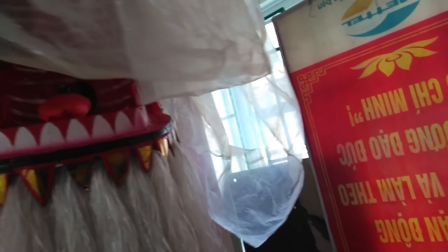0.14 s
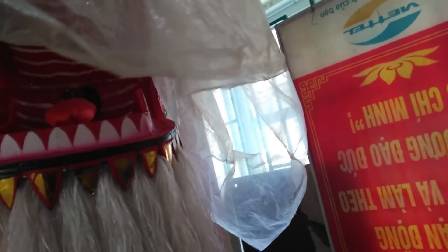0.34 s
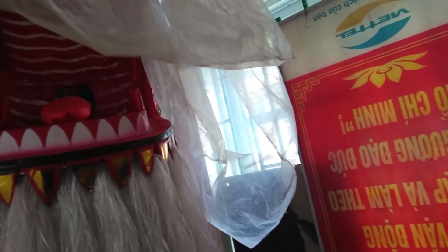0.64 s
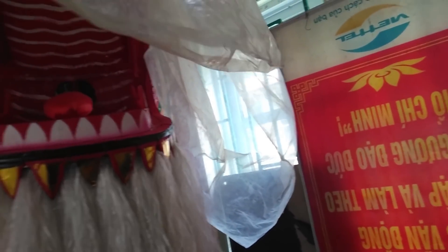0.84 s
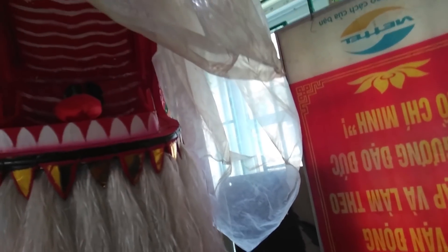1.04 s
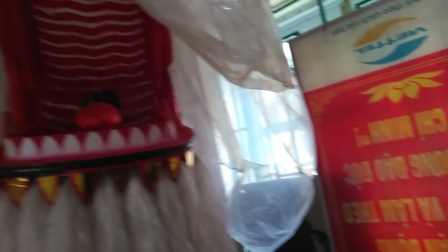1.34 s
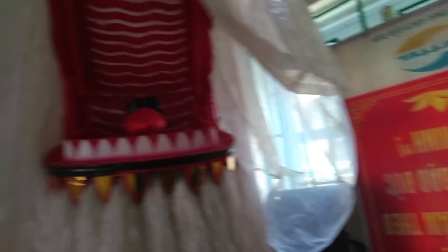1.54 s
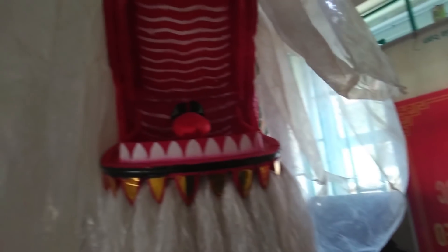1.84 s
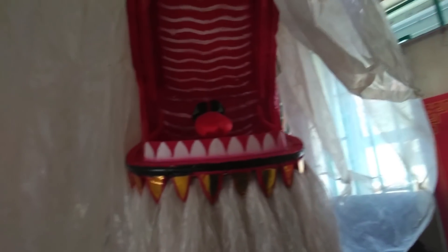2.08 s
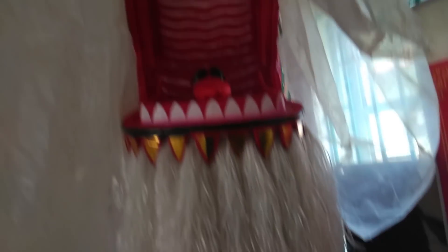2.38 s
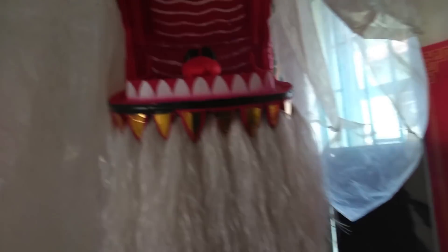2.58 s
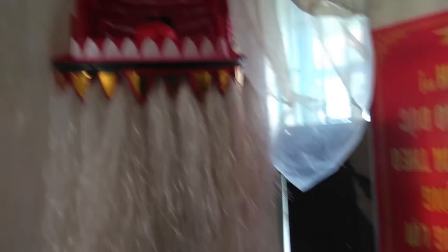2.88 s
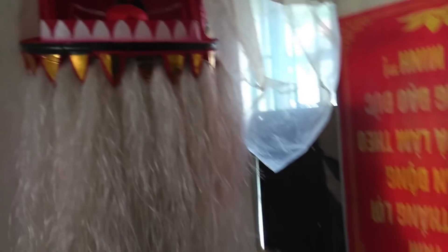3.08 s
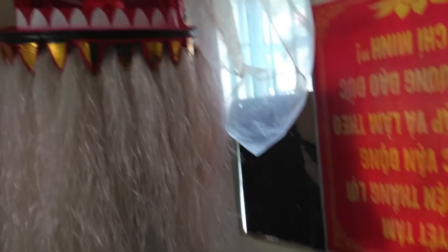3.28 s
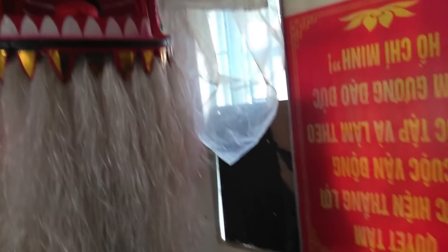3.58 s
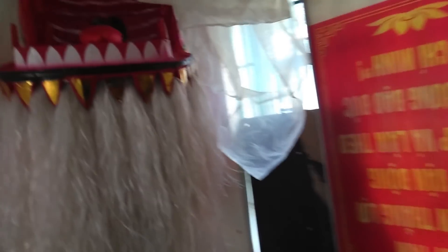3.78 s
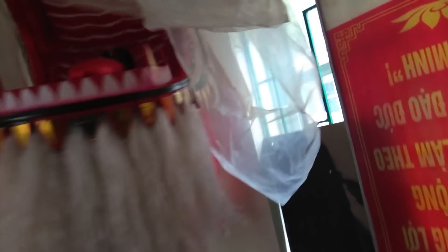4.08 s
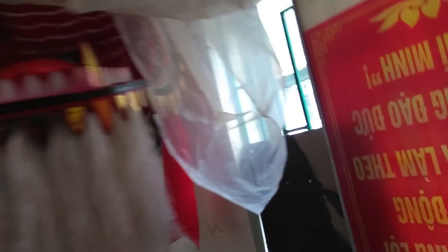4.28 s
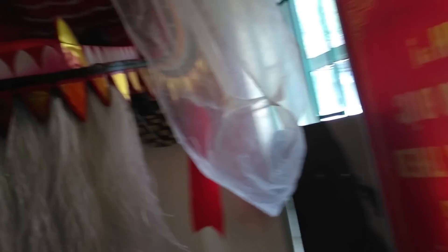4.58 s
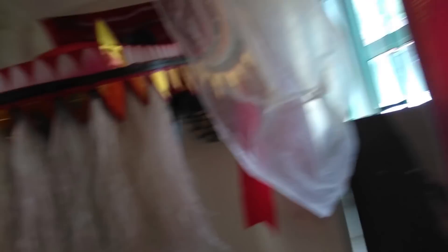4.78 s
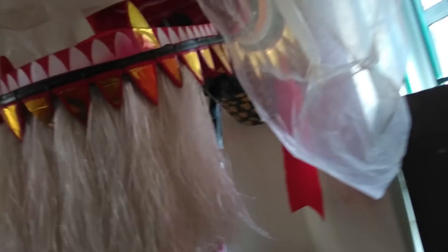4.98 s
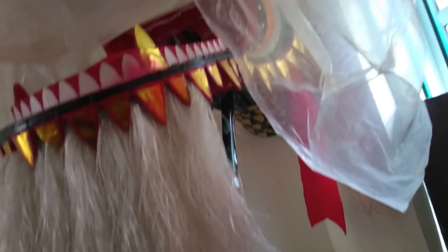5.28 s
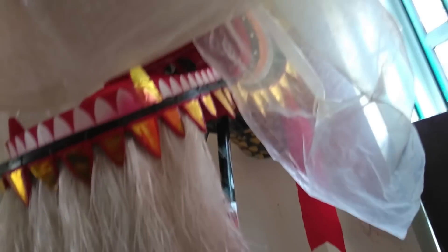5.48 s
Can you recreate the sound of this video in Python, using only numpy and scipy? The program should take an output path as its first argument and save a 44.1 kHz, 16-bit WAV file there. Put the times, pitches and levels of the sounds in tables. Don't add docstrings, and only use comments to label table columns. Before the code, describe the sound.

A dry, bright plastic hiss is already under way, dotted with crisp crease clicks, then thins to almost nothing around the middle. A second, smoother stroke swells and dies away with heavy fold rustles. Handling thumps and rumble are soft and low. Late on, something hard knocks farther off with a short room echo, then the scraping fades out. Close, essentially mono, indoor phone pickup.

```python
import sys
import numpy as np
from scipy import signal
from scipy.fft import rfft, irfft, next_fast_len
from scipy.io import wavfile
from scipy.ndimage import uniform_filter1d, map_coordinates

SR = 44100
rng = np.random.default_rng(int(sys.argv[2]) if len(sys.argv) > 2 else 0)


def magnitude_from_level(level_db):
    exponent = np.asarray(level_db, float) / 20
    return 10 ** exponent


def dump(signal):
    limited = np.clip(np.atleast_2d(signal).T, -1, 1)
    pcm = np.round(limited * 32767).astype(np.int16)
    wavfile.write(sys.argv[1], SR, pcm)


N = 248283


def unit(x):
    return x / np.sqrt(np.mean(x ** 2) + 1e-20)


def along(points, hz):
    f, v = np.transpose(points)
    return np.interp(np.log(hz + 1), np.log(f + 1), v)


def curves(rows):
    s, *cols = np.transpose(rows)
    return [np.interp(np.arange(N) / SR, s, c) for c in cols]


def wobble(rate):
    coarse = np.arange(0, N + 16, 16)
    points = rng.standard_normal(int(N * rate / SR) + 4)
    return np.interp(np.arange(N), coarse, map_coordinates(points, [coarse * rate / SR]))


def filtered(x, response):
    m = next_fast_len(len(x) + 8192)
    return irfft(rfft(x, m) * response(np.fft.rfftfreq(m, 1 / SR)), m)[:len(x)]


def swells(rows, rise_s):
    t = np.arange(0, N + 64, 64) / SR
    s, db, t60 = np.transpose(rows)[:, :, None]
    gain = magnitude_from_level(db - 60 * np.maximum((s - t) / rise_s, (t - s) / t60))
    return np.interp(np.arange(N) / SR, t, np.sqrt((gain ** 2).sum(0)))


def rubbing(spectrum, patchy_db, grit_db):
    z = signal.stft(rng.standard_normal(N + 512), nperseg=512)[2]
    patches = uniform_filter1d(rng.standard_normal(z.shape), size=3, axis=0)
    patches = uniform_filter1d(patches, size=12, axis=1)
    noise = signal.istft(z * magnitude_from_level(patchy_db * unit(patches)), nperseg=512)[1][:N]
    slipping = rng.random(N) < 600 / SR
    slips = rng.uniform(-0.8, 1, N) * slipping * magnitude_from_level(0.63 * wobble(24))
    return unit(filtered(noise + magnitude_from_level(grit_db) * unit(slips), lambda hz: magnitude_from_level(along(spectrum, hz))))


def slide():
    # (time [s], pressure [dB], brightness [dB])
    pull = [(0, -34.5, -4.5), (.13, -36, -2.5), (.65, -37.5, -2.5), (1.04, -41.5, -2), (1.2, -47, 3.5),
            (1.45, -46.5, -1.5), (1.83, -55.5, 4), (2.4, -80, 7), (2.53, -63.5, 16), (2.66, -46.5, 2.5),
            (2.9, -40, 1), (3.34, -37, -1), (3.95, -35, -1.5), (4.25, -39, 0.5), (4.5, -44, 0.5),
            (5.02, -47.5, 7.5), (5.2, -52, 8.5), (5.63, -55.5, 8.5)]
    # (time [s], pressure [dB], t60 [s])
    shakes = [
        (1.86, -48.5, 1.26),
        (2.195, -53.5, 0.92),
        (4.23, -41.5, 1.8),
        (5.38, -68, 0.34),
    ]
    # (time [s], body level [dB], t60 [s])
    brushes = [(.0, -42, 0.82), (.92, -47, 2.5), (2.55, -52.5, 2), (3.33, -61, 1.5), (4.19, -47, 1.9),
               (4.69, -47, 0.25), (4.77, -44, 0.27), (5.12, -59, .8), (5.35, -54.5, 0.65),
               (5.58, -51, 0.16)]
    # (frequency [Hz], level [dB per Hz])
    hiss_colour = [(1470, -39), (2500, -4), (2680, -5.5), (3570, -4.5), (4030, -3), (4890, -0.5),
                   (8000, -8), (10400, -26), (17600, -120)]
    body_colour = [(350, -64), (600, -15), (657, -12.5), (1120, -3.5), (1360, -3), (1670, -1.5), (2690, -3),
                   (3200, -4), (4160, -8), (7040, -120)]
    fizz_colour = [(4120, -43), (7000, -33.5), (8390, -6.5), (10400, -8), (13600, -11), (15600, -15)]

    pull_db, bright_db = curves(pull)
    hiss_db = 20 * np.log10(np.hypot(magnitude_from_level(pull_db), swells(shakes, rise_s=0.086)))
    body_db = -46.5 + 0.71 * (hiss_db + 40)
    fizz_db = -48.5 + 1.425 * (hiss_db + 40) + bright_db
    flutter = 0.1 * wobble(9.0) + 0.23 * wobble(30)
    hiss = magnitude_from_level(hiss_db + flutter) * rubbing(hiss_colour, patchy_db=1.5, grit_db=-8.0)
    belly = np.hypot(magnitude_from_level(body_db), swells(brushes, rise_s=0.22))
    body = belly * magnitude_from_level(flutter + 0.23 * wobble(26)) * rubbing(body_colour, patchy_db=1.0, grit_db=-5.0)
    fizz = magnitude_from_level(fizz_db + flutter + 0.42 * wobble(12)) * rubbing(fizz_colour, patchy_db=-1.4, grit_db=-10)
    return hiss + body + fizz


def grip():
    # (time [s], rumble level [dB], t60 [s])
    holds = [(0, -69, 3), (.34, -79, 0.54), (.58, -89, 1), (.9, -89, 2), (1.02, -75, 0.27),
             (1.13, -68, 0.32), (1.44, -76, 0.54), (1.79, -83, 1.5), (2.19, -66, 0.75), (2.51, -60.5, 0.47),
             (2.71, -66, 0.75), (3.01, -63.5, 1.5), (3.13, -74, 1), (3.21, -67, 0.18), (3.6, -98, 2.6),
             (3.81, -71, 0.74), (4.06, -74, .7), (4.19, -68, 1.9), (4.34, -63.5, 1.1), (4.5, -79, 1),
             (4.61, -67, .45), (4.77, -55.5, 1.3), (4.99, -55, 0.91), (5.09, -55, .5), (5.25, -80, 1.3)]
    # (frequency [Hz], level [dB per Hz])
    rumble_colour = [(13, -48), (22, -27), (32, -32), (50, 0), (70, 8.5), (140, 4.5), (180, -1.5),
                     (310, -120)]

    rumble = unit(magnitude_from_level(wobble(9.4)) * rubbing(rumble_colour, patchy_db=6.0, grit_db=-12))
    return (swells(holds, rise_s=0.097) + magnitude_from_level(-100)) * rumble


def ridges():
    # (time [s], ridges per second [Hz],
    # first tone [dB], second tone [dB], third tone [dB], fine weave [dB])
    strokes = [
        [(0, 1272, -64, -62, -62, -61), (.2, 1272, -64, -64, -60, -60), (.3, 1268, -64, -62, -50, -60),
         (.36, 1245, -63, -52, -47, -64), (.48, 1205, -63, -51, -55, -68), (.55, 1200, -68, -61, -56, -65),
         (.62, 1225, -72, -56, -64, -62), (.69, 1222, -74, -65, -69, -60), (.88, 1070, -86, -72, -79, -62),
         (1.1, 958, -97, -78, -90, -66), (1.35, 842, -99, -85, -99, -72)],
        [(2.65, 795, -80, -66, -99, -95), (2.78, 915, -69, -55, -95, -85), (2.9, 1010, -65, -56, -86, -74),
         (3.01, 1150, -61, -53, -79, -66), (3.14, 1238, -58, -51, -72, -61), (3.26, 1292, -54, -57, -66, -59),
         (3.38, 1340, -56, -50, -58, -58), (3.46, 1355, -57, -60, -58, -58), (3.55, 1378, -50, -62, -58, -59),
         (3.66, 1392, -52, -62, -58, -58), (3.72, 1400, -61, -60, -59, -58), (3.92, 1422, -60, -66, -61, -57),
         (4.08, 1340, -62, -70, -72, -61), (4.3, 1160, -76, -71, -91, -66), (4.74, 912, -92, -80, -92, -68)],
        [(4.73, 1070, -99, -91, -99, -62), (5.1, 870, -99, -90, -99, -65), (5.4, 725, -99, -90, -99, -69),
         (5.55, 650, -99, -90, -99, -88)],
    ]
    upper_weave_db = [-30, -30, -2]

    out, t = np.zeros(N), np.arange(N) / SR
    for stroke, over_db in zip(strokes, upper_weave_db):
        rate_hz, first_db, second_db, third_db, weave_db = curves(stroke)
        tones = [(1, first_db), (2, second_db), (3, third_db), (10, weave_db), (15, weave_db + over_db)]
        start_s, end_s = stroke[0][0], stroke[-1][0]
        during = np.interp(t, [end_s, end_s + .05], [1, 0]) * (t >= start_s)
        phase = 2 * np.pi * np.cumsum(rate_hz * (1 + .0035 * wobble(35))) / SR
        fuzz = 2 * np.pi * 70 * np.cumsum(wobble(250)) / SR
        for k, db in tones:
            level = np.sqrt(2) * magnitude_from_level(db + 2.3 + 1.1 * wobble(22))
            out += during * level * np.sin(k * phase + .7 * wobble(60) + (k > 3) * fuzz)
    return out


def folds():
    # (time [s], rustle level [dB], t60 [s], weight [dB])
    shifts = [(.03, -45.5, 1.9, -9.5), (.33, -54.5, 0.75, -5), (.55, -54.5, 1.8, -34),
              (.66, -54.5, 2.1, -17), (.82, -53, 0.76, -29), (.97, -49, 0.54, -18), (1.109, -51, 0.12, -19),
              (1.44, -48.5, 0.45, -1.5), (1.57, -53.5, 0.65, -18), (1.73, -54.5, 0.17, -19),
              (1.85, -66, 0.36, -17), (1.93, -64, 0.26, 0), (2.19, -56.5, 0.41, -18),
              (2.52, -76.5, 1.2, -9), (2.77, -73, 1.7, -4), (3.0, -52.5, 0.15, -2), (3.09, -47.5, 1.35, -5),
              (3.38, -44, 1.7, -19), (3.79, -54.5, 2, 1), (3.94, -54, 1.2, -15), (4.1, -46, 1.35, -21),
              (4.2, -43.5, 0.65, -2), (4.37, -49.5, 0.47, 1), (4.65, -44, 1.5, -11), (4.7, -59, 0.52, -12),
              (4.75, -49, 0.37, 2.5), (4.94, -57, 0.65, -21), (4.99, -53.5, 0.89, 0),
              (5.199, -51, 0.62, -28), (5.3, -60, 0.34, -17), (5.53, -75, 0.84, -22)]
    # (frequency [Hz], level [dB per Hz])
    dull_colour = [(180, -39), (300, -7), (328, 0), (371, -0.5), (800, -4), (1040, -1), (1760, -120)]
    deep_colour = [(76, -46), (130, -5), (183, 2.5), (254, 8.5), (300, 4.5), (390, -19), (660, -120)]

    rise_s = 0.23
    dull_gain = swells([row[:3] for row in shifts], rise_s) + magnitude_from_level(-85.5)
    heavy = [(s, db + weight_db, 0.72 * t60) for s, db, t60, weight_db in shifts]
    deep_gain = swells(heavy, rise_s) + magnitude_from_level(-103)
    dull = unit(magnitude_from_level(0.53 * wobble(13)) * rubbing(dull_colour, patchy_db=1.0, grit_db=-10.0))
    deep = unit(magnitude_from_level(0.72 * wobble(6.3)) * rubbing(deep_colour, patchy_db=2.0, grit_db=-4))
    return dull_gain * magnitude_from_level(-5.0) * dull + deep_gain * magnitude_from_level(-7.5) * deep


def snaps():
    # (time [s], peak level [dB], ring [Hz], low part [dB])
    soft_creases = [(0.0521, -19, 7050, -33), (0.0531, -20.5, 3660, -27), (0.1538, -23, 3800, -20),
                    (0.2566, -23, 3200, -25), (0.2952, -25, 4300, -9), (0.2965, -19, 4200, -24),
                    (0.2968, -24, 2350, -17), (0.5738, -18.5, 5300, -46), (0.5752, -30, 4330, -42),
                    (0.639, -23, 4770, -6), (0.6642, -21, 5000, -13), (0.7637, -13.5, 5730, -34),
                    (0.7638, -31, 8800, -40), (0.7645, -18, 4330, -30), (0.7644, -21, 3130, -32),
                    (0.7722, -36, 6100, -30), (0.8534, -32, 4330, -1), (0.7012, -22.5, 5700, -27),
                    (0.9442, -27.5, 6500, -22), (0.945, -25, 3080, -4.5), (0.9485, -27, 4040, -13),
                    (0.876, -29, 3820, -4), (1.057, -29.5, 5950, -7), (1.0556, -27.5, 2530, -3.5),
                    (1.288, -33.5, 3200, -14), (1.4147, -30, 4300, -10), (1.4529, -24, 3000, -15),
                    (1.4615, -23.5, 3640, -11), (1.664, -35, 2110, -23), (1.7106, -36, 3660, -1),
                    (2.0466, -43.5, 2450, 0), (2.17, -51, 5020, 4.5), (2.1723, -45, 4900, 8),
                    (2.1919, -28, 4850, -8.5), (2.1908, -33, 2480, -8), (2.2125, -35.5, 2200, -23),
                    (2.2523, -43, 2770, 4), (2.3118, -43, 2725, -6.5), (2.445, -50, 2820, -16),
                    (2.4907, -55, 2280, -14), (2.508, -50, 3480, -2), (2.524, -41, 2600, -2),
                    (2.9841, -26.5, 4260, -6), (4.2206, -22, 5700, -23), (5.5799, -41, 1920, -25),
                    (5.58, -39.5, 3540, -18), (5.582, -38, 5200, -16), (5.6285, -39, 4300, -15)]
    # (time [s], peak level [dB], ring [Hz], low part [dB])
    stiff_creases = [(1.4263, -26, 4700, -2.5), (1.4304, -21.5, 5300, -13), (1.8513, -18.5, 5150, -13),
                     (1.8522, -34, 6500, -2.5), (1.8963, -35, 4600, -3), (1.9235, -30, 2380, -14),
                     (1.9257, -28.5, 5100, -11), (1.9268, -34, 2590, -10.5), (4.6094, -24, 6200, -7.5),
                     (4.9203, -28, 6900, -24), (5.2979, -39, 7300, -4), (5.4602, -30.5, 5800, -29),
                     (5.4605, -40, 8400, -23)]

    out, t = np.zeros(N + SR), np.arange(SR // 20) / SR
    click = 9 * (np.arange(len(t)) == 4)
    creases = [(*row, 0.004, -20) for row in soft_creases]
    creases += [(*row, 0.0026, -11.5) for row in stiff_creases]
    for s, db, hz, low_db, t60, high_db in creases:
        noise = rng.standard_normal((3, len(t)))
        edge = magnitude_from_level(-60 * t / t60) * (1 - np.exp(-t / .00008))
        fade = edge + magnitude_from_level(-5) * np.interp(t - 0.00116, t, edge, left=0)
        near_ring = lambda f: np.exp(-(np.log((f + 1) / hz) / 0.38) ** 2)
        crack = unit(filtered(noise[0] + click, near_ring))
        ring = np.sin(2 * np.pi * hz * t * (1.04 - 30 * t)) + .33 * crack
        ring = ring / np.abs(ring * fade).max()
        tap = unit(filtered(noise[1], lambda f: (f > 500) * (f < 2500))) * fade ** 0.17
        bright = lambda f: (f > 6500) * (1 - 0.35 * np.exp(-((f - 10800) / 1200) ** 2))
        tick = unit(filtered(noise[2] + click, bright)) * edge ** 0.47
        snap = ring * fade + 0.32 * magnitude_from_level(low_db) * tap + 0.35 * magnitude_from_level(high_db) * tick
        out[round(s * SR):][:len(t)] += magnitude_from_level(db + 2) * snap
    return filtered(out[:N], lambda f: 1 / (1 + (300 / (f + 1)) ** 4))


def whistles():
    # (start [s], end [s], pitch [Hz], level [dB])
    tones = [
        (2.62, 3.35, 11600, -64),
        (.3, .5, 11000, -62),
        (4.36, 4.62, 68, -67),
        (4.28, 4.4, 70, -64),
    ]

    out, t = np.zeros(N), np.arange(N) / SR
    scatter = np.cumsum(wobble(200)) / SR
    for start_s, end_s, hz, db in tones:
        swell = np.sin(np.pi * np.clip((t - start_s) / (end_s - start_s), 0, 1)) ** .5
        out += magnitude_from_level(db + 4) * swell * np.sin(2 * np.pi * hz * (t + .007 * scatter))
    return out


def bumps():
    # (time [s], peak level [dB], ring [Hz], t60 [s], puff level [dB])
    contacts = [(0.979, -58, 703, 0.25, 1), (1.109, -78, 570, 0.17, 3), (1.422, -50.5, 395, 0.25, 5),
                (2.184, -46, 692, 0.13, 15.5), (2.463, -55, 94, 0.12, 11.5), (3, -55, 141, 0.13, -6),
                (3.071, -44.5, 242, 0.27, 2), (3.384, -45, 570, 0.24, -30), (3.499, -45, 590, 0.4, -11),
                (3.788, -49, 346, 0.25, -8), (3.79, -49, 227, 0.18, -13), (3.389, -51, 253, 0.37, -5),
                (3.935, -42.5, 405, 0.11, -12), (4.182, -46, 512, 0.23, 6), (4.83, -41.5, 623, 0.24, -16),
                (4.975, -47, 120, 0.24, 15), (5.018, -48, 100, 0.3, -16), (5.089, -57, 115, 0.12, 10),
                (5.18, -57, 557, 0.23, -17)]

    out, t = np.zeros(N + SR), np.arange(SR // 2) / SR
    for s, db, hz, t60, puff_db in contacts:
        fade = magnitude_from_level(-60 * t / t60) * (1 - np.exp(-t / 0.0089))
        puff = unit(filtered(rng.standard_normal(len(t)), lambda f: f / (1 + (f / 700) ** 4)))
        ring = np.sin(2 * np.pi * hz * t)
        out[round(s * SR):][:len(t)] += magnitude_from_level(db) * fade * (ring + 0.14 * magnitude_from_level(puff_db) * puff)
    return out[:N]


def knock():
    # (time [s], peak level [dB])
    landings = [
        (4.742, -18.5),
        (4.753, -24.5),
    ]
    # (pitch [Hz], level [dB], t60 [s])
    modes = [(570, 1, 0.1), (626, -7, 0.3), (1100, -4, 0.2), (1220, -1, 0.21), (1310, -2, 0.3),
             (1850, -11, 0.3), (2270, 2, 0.3), (2860, -10, 0.3), (3520, -11, 0.2), (4020, 0, 0.066)]
    # (frequency [Hz], level [dB per Hz])
    burst_colour = [(88, -27), (150, -11), (638, -5), (799, -10), (1290, 3.5), (2420, -4), (2710, -10),
                    (7000, -10), (9100, -44), (15400, -120)]

    out, t = np.zeros(N + SR), np.arange(SR // 2) / SR
    for s, db in landings:
        ring = np.zeros(len(t))
        for hz, level, t60 in modes:
            fade = magnitude_from_level(level - 60 * t / min(t60, .06))
            ring += fade * np.sin(2 * np.pi * hz * t + rng.uniform(0, 5.7))
        burst = unit(filtered(rng.standard_normal(len(t)), lambda f: magnitude_from_level(along(burst_colour, f))))
        burst *= magnitude_from_level(-60 * t / 0.076) + magnitude_from_level(-7 - 60 * t / 0.5)
        ring *= 1 - np.exp(-t / 0.0018)
        out[round(s * SR):][:len(t)] += magnitude_from_level(db - 15.5) * ring + magnitude_from_level(db - 17.0) * burst
    return out[:N]


def room(x):
    # (frequency [Hz], t60 [s])
    ring_times = [
        (200, 0.13),
        (2000, 0.43),
        (10000, 0.032),
    ]

    hz, t, z = signal.stft(rng.standard_normal(SR // 2), SR, nperseg=256)
    tail = signal.istft(z * magnitude_from_level(-60 * t / along(ring_times, hz)[:, None]), SR, nperseg=256)[1]
    return signal.fftconvolve(np.pad(x, (200, 0)), tail / np.linalg.norm(tail))[:N]


def scene():
    near, far, whine = snaps(), knock(), ridges() + whistles()
    mono = slide() + grip() + folds() + near + whine + bumps() + far
    mono += room(magnitude_from_level(-13.5) * near + magnitude_from_level(-10) * far)
    mono += magnitude_from_level(-9) * room(whine)
    return np.array([mono, mono])


def gated(x):
    # (frequency [Hz], level [dB])
    closing = [(100, -114), (500, -100), (2000, -95), (6000, -95), (11000, -100), (13000, -99),
               (15500, -97)]
    # (centre [Hz], width [Hz], shift [dB])
    bias = [(520, 150, 5), (15200, 900, 2), (2000, 200, 5), (2450, 200, 7), (2850, 200, -8), (4000, 200, 5),
            (4600, 150, 5), (5100, 200, -3), (5650, 250, 11), (6250, 200, -5), (7000, 350, 7),
            (12500, 2000, 3)]
    # (frequency [Hz], gain [dB])
    shut = [(100, -10), (450, -14), (700, -22), (6000, -24), (7500, -18), (9500, -15), (11000, -42),
            (16000, -46)]
    # (frequency [Hz], size [dB])
    ragged = [
        (100, 5),
        (8000, 4.5),
        (12000, 3.2),
    ]
    # (time [s], shift [dB])
    top_drift = [(0, -1), (1.6, -1), (1.75, 1), (1.9, -3), (2.15, -4), (2.3, 1), (4.9, 0), (5.3, 6),
                 (5.63, 11)]

    hz, t, z = signal.stft(x, SR, nperseg=2048)
    band = np.arange(len(hz)) // 8
    power = np.add.reduceat(np.abs(z) ** 2, np.arange(0, len(hz), 8)) / 8
    drift = unit(uniform_filter1d(rng.standard_normal(power.shape), size=6, axis=1))
    ragged_db = along(ragged, hz[::8])[:, None] * drift
    bias_db = sum(db * np.exp(-((hz - at_hz) / wide_hz) ** 2) for at_hz, wide_hz, db in bias)
    threshold_db = along(closing, hz) + bias_db
    margin_db = (10 * np.log10(power + 1e-20) + ragged_db)[band] - threshold_db[:, None]
    top_share = 1 / (1 + (13500 / (hz + 1)) ** 16)
    margin_db -= np.outer(top_share, np.interp(t, *np.transpose(top_drift)))
    closed = 1 / (1 + np.exp(np.clip(margin_db / .8, -30, 30)))
    gain = magnitude_from_level(along(shut, hz)[:, None] * closed) * (hz < 15750)[:, None]
    streaks = uniform_filter1d(rng.standard_normal(z.shape), size=3, axis=0)
    streaks = uniform_filter1d(streaks, size=4, axis=1)
    return signal.istft(z * gain * magnitude_from_level(1.76 * unit(streaks)), SR, nperseg=2048)[1][:N]


def side_noise(x):
    # (centre time [s], low edge [Hz], high edge [Hz])
    side_bursts = [(.081, 4800, 5800), (.081, 8300, 9600), (.174, 6900, 8300), (.476, 4150, 5800),
                   (.476, 12400, 13800), (1.033, 6200, 7600), (1.033, 12400, 15200), (1.196, 4150, 5200),
                   (1.637, 9700, 11000), (4.33, 4800, 5800), (4.33, 12400, 13800), (4.33, 14500, 15750),
                   (4.446, 6200, 7600)]

    side, window = np.zeros(N), np.sqrt(np.hanning(2048))
    for s, low_hz, high_hz in side_bursts:
        start = round(s * SR) - 1024
        band = filtered(x[start + 1024:start + 5120], lambda hz: (hz > low_hz) * (hz < high_hz))
        side[start:start + 2048] += magnitude_from_level(-1.5) * window * band[1024:3072]
    return side


def band_limit(x):
    return signal.sosfilt(signal.butter(12, 16660, fs=SR, output="sos"), x)


def record(dry):
    mono = gated(dry[0])
    side = side_noise(mono)
    return band_limit(np.array([mono + side, mono - side]))


dry = scene()
out = record(dry)
dump(out)
```